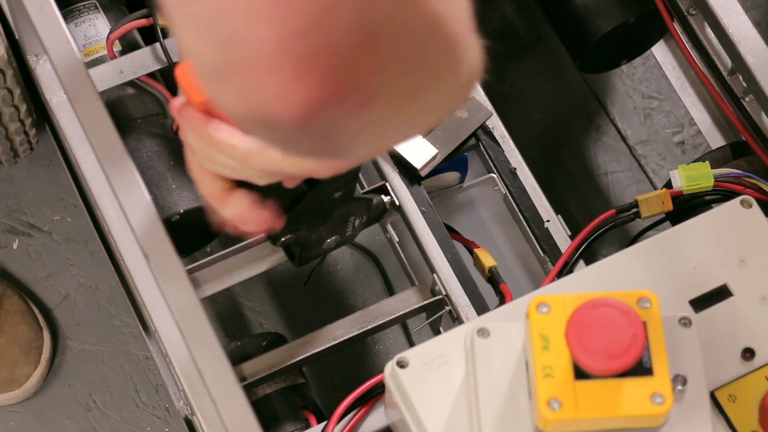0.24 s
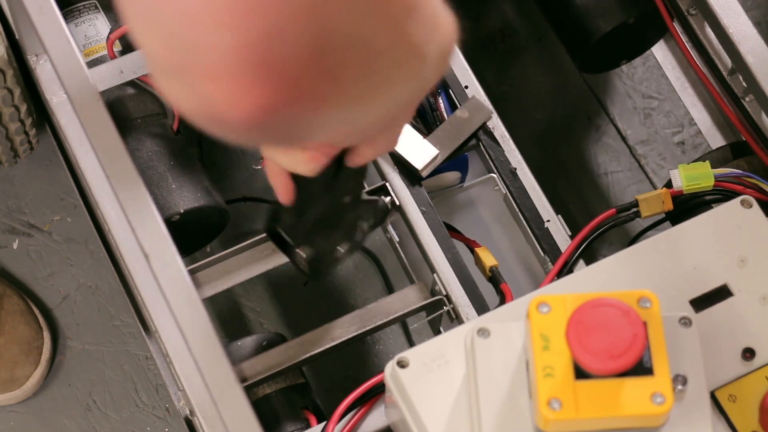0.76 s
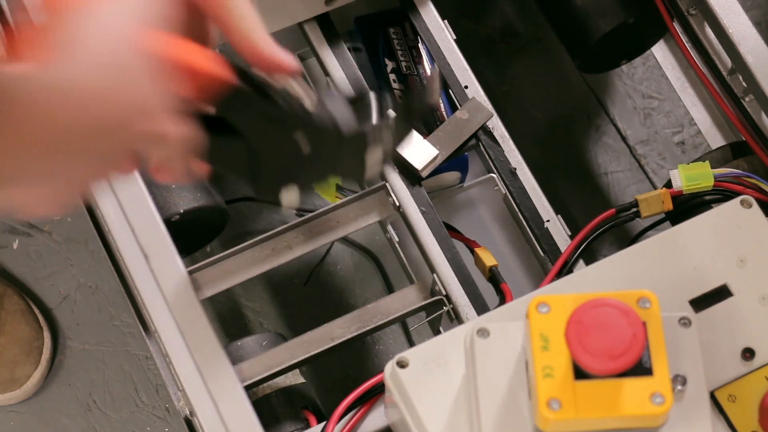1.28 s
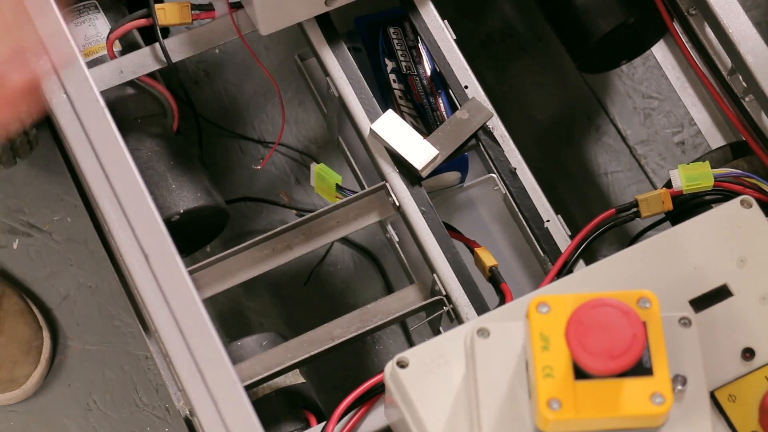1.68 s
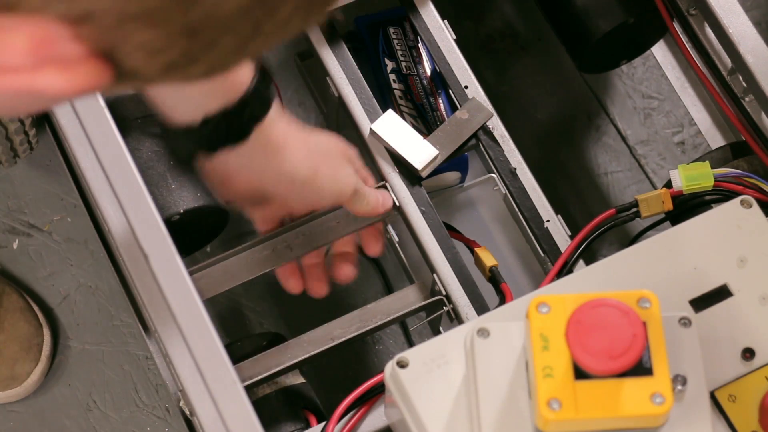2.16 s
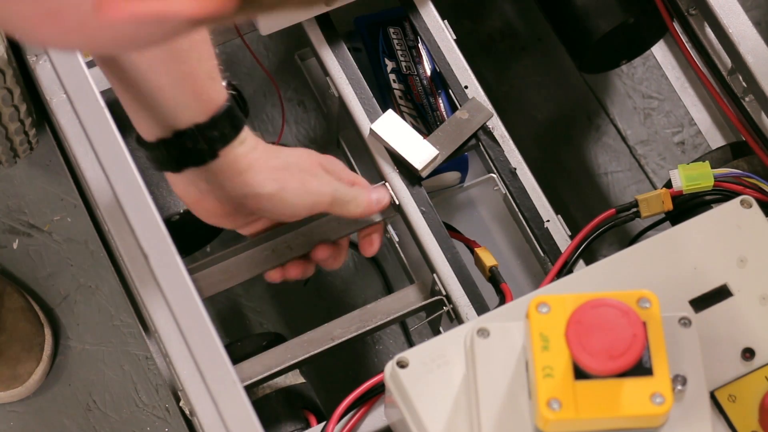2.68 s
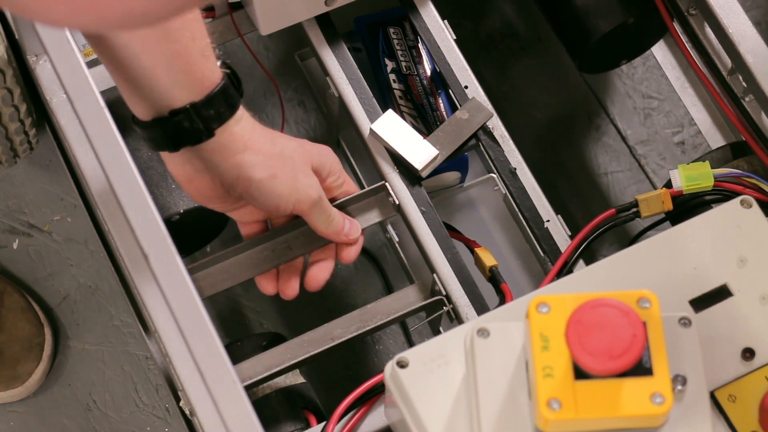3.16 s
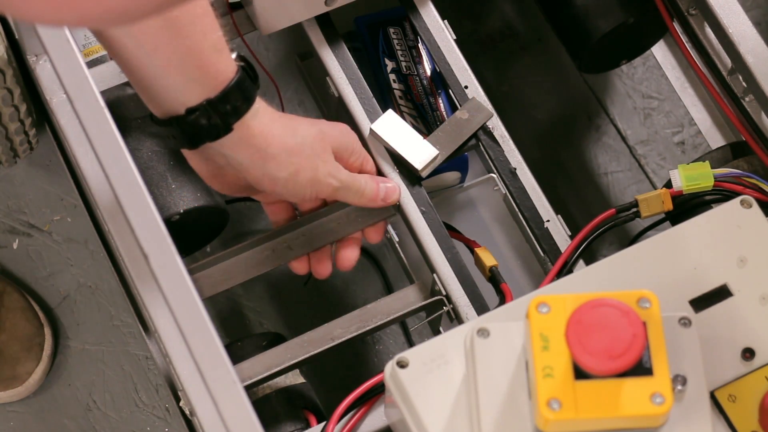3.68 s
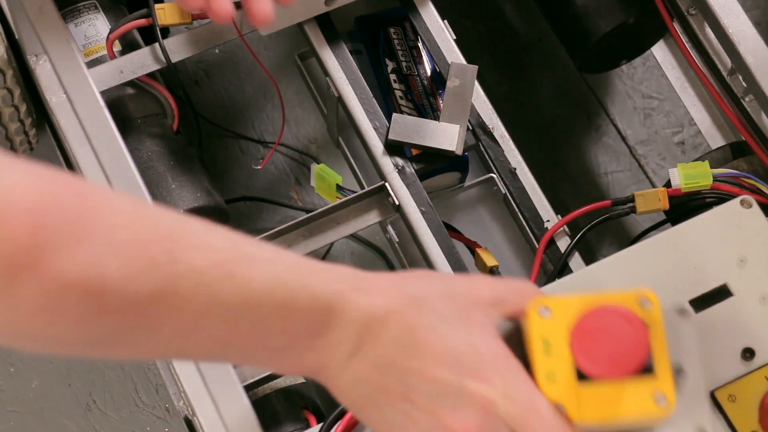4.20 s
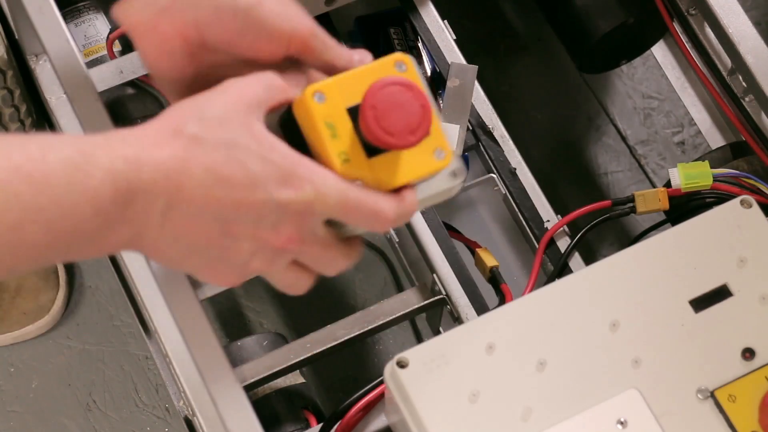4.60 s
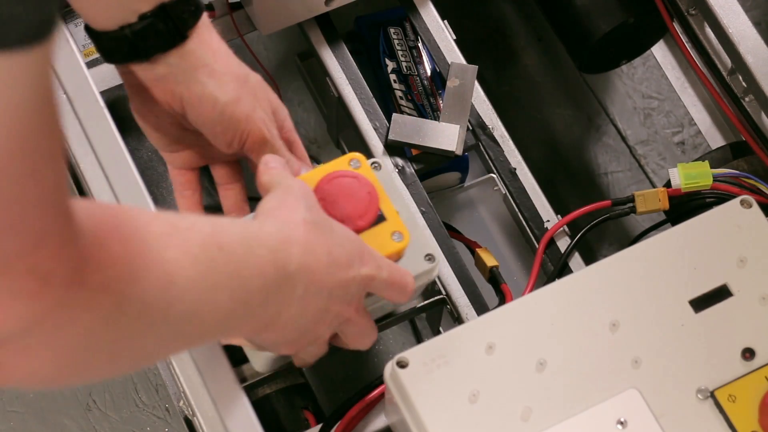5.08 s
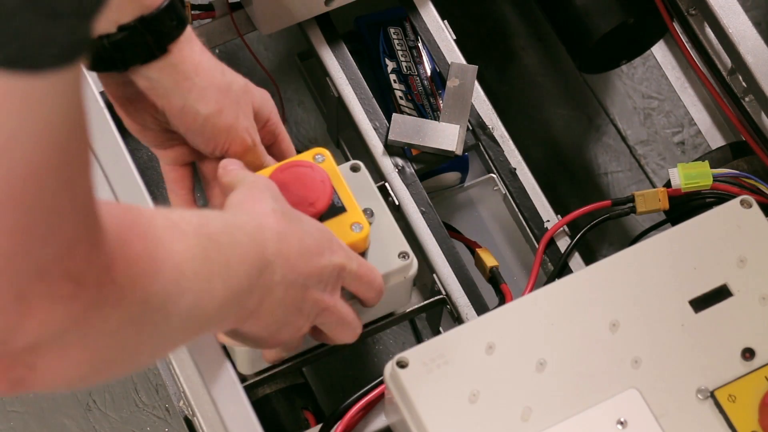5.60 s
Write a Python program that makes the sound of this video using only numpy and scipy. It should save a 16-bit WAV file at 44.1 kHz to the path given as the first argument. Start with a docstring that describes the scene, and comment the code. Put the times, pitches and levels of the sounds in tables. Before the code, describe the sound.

In a small workshop, a hand rivet tool clicks, then snaps very loudly, followed by tiny ticks, a metal bar clack and hollow plastic box knocks.

```python
"""Setting a blind rivet

A hand tool sets a blind rivet in an aluminium frame: its jaws slip, then the mandrel breaks with a snap that
overloads the microphone. Small ticks follow, a handled bar clacks, and a plastic switch box is knocked about.
Impacts are decaying modes and coloured noise; rubbing is a random train of friction slips through resonances.
A small workshop adds reverberation to most blows, under steady air noise and ventilation hum.
"""
import sys
import numpy as np
from scipy import signal
from scipy.fft import rfft, irfft, next_fast_len
from scipy.io import wavfile
from scipy.ndimage import map_coordinates

SR = 44100
rng = np.random.default_rng(int(sys.argv[2]) if len(sys.argv) > 2 else 0)


def dump_mix(stems):
    """Bounce the given channels to the path in sys.argv[1] as a 16-bit WAV at rate SR."""
    frames = np.atleast_2d(stems).T  # one column per channel
    limited = np.clip(frames, -1, 1)  # hard clip at full scale
    pcm = np.round(limited * 32767).astype(np.int16)
    wavfile.write(sys.argv[1], SR, pcm)


N = 257984
T = np.arange(SR) / SR  # the life of one blow, s


def amp(db):
    """Level law: decibels to amplitude gain."""
    return 10 ** (np.asarray(db) / 20)


def unit(x):
    """Normalization: x scaled to rms 1."""
    return x / np.sqrt(np.mean(x ** 2) + 1e-20)


def along(points, hz):
    """Logarithmic frequency scale: (frequency, value) points interpolated on it."""
    f, v = np.transpose(points)
    return np.interp(np.log(hz + 1), np.log(f + 1), v)


def wobble(rate, size=N):
    """Slow random modulation: a smooth curve through rate random knots a second."""
    knots = rng.standard_normal(int(size * rate / SR) + 4)
    return map_coordinates(knots, [np.arange(size) * rate / SR])


def fade(t60, t=T):
    """Exponential damping: a fall of 60 dB in t60 seconds."""
    return np.exp(-np.log(1000) * t / t60)


def noise(gain, size):
    """Spectral shaping: white noise coloured by a gain of frequency, at rms 1."""
    white = rfft(rng.standard_normal(size))
    return unit(irfft(white * gain(np.fft.rfftfreq(size, 1 / SR)), size))


def through(x, gain):
    """Linear filtering: x passed through a gain of frequency, at rms 1."""
    m = next_fast_len(N + SR // 2)
    return unit(irfft(rfft(x, m) * gain(np.fft.rfftfreq(m, 1 / SR)), m)[:N])


def colour(points, tilt_db=0):
    """Spectral envelope: a gain curve tilted about 1 kHz in dB per octave, the tilt level below 200 Hz."""
    return lambda hz: amp(along(points, hz) + tilt_db * np.log2(np.maximum(hz, 200) / 1000))


def resonances(peaks):
    """Damped oscillators: summed band-pass responses, width between half-power points, signs alternating."""
    def gain(f):
        total = 0
        for k, (centre, width, db) in enumerate(peaks):
            response = 1j * f * width / (centre * centre - f * f + 1j * f * width)
            total = total + (-1) ** k * amp(db) * response
        return total
    return gain


def narrow(peaks):
    """Separate resonances with steep skirts: gain is halved one width to either side of the centre."""
    return lambda f: sum(amp(db) / (1 + ((f - centre) / width) ** 2) for centre, width, db in peaks)


def ringing(modes, tilt_db=0, scatter_db=0):
    """Modal synthesis: a sum of decaying sines; loose joints make their phases wander."""
    out = np.zeros(SR)
    for hz, db, t60 in modes:
        size = amp(db + tilt_db * np.log2(hz / 1000) + scatter_db * rng.standard_normal())
        wander = .7 * wobble(70, size=SR)  # radians
        out += size * fade(t60) * np.sin(2 * np.pi * (hz * T + rng.random()) + wander)
    return out


def dying(x, decay):
    """Frequency-dependent damping: each band of x dies with its own t60."""
    hz, t, bands = signal.stft(x, SR, nperseg=256)
    damped = bands * fade(along(decay, hz)[:, None], t)
    return signal.istft(damped, SR, nperseg=256)[1][:len(x)]


def add(track, s, sound):
    """Superposition: mix a sound into the track from time s on."""
    part = track[max(round(s * SR), 0):][:len(sound)]
    part += sound[:len(part)]


# reverberation time of the workshop: frequency (Hz), t60 (s)
ROOM_DECAY = [(100, 0.25), (700, .6), (3000, 0.61), (8000, .48), (14000, 0.38)]


def in_room(x, wet_db):
    """Diffuse reverberation: a blow convolved with a decaying noise tail of unit energy."""
    tail = dying(rng.standard_normal(SR), ROOM_DECAY) * (1 - np.exp(-T / 0.0088))
    tail = tail / np.linalg.norm(tail)
    return x + amp(wet_db) * signal.fftconvolve(x, tail)[:len(x)]


def slips(rate, spread_db):
    """Stick-slip friction: tiny slips of uneven size at random times, about rate a second."""
    size = amp(spread_db * rng.standard_normal(N)) * rng.standard_normal(N)
    return size * (rng.random(N) < rate / SR)


# every rub: rise time, growth up to its end, t60 after it
RUB_ATTACK_S, RUB_SWELL_DB, RUB_RELEASE_S = 0.04, 3, 0.52


def stroke(s, length):
    """Friction envelope: a rub sets in, swells as the hand presses on, and decays after its end."""
    t = np.arange(N) / SR - s
    onset = np.clip(t / RUB_ATTACK_S, 0, 1)
    swell = amp(RUB_SWELL_DB * (np.clip(t / length, 0, 1) - 1))
    return onset * swell * fade(RUB_RELEASE_S, np.maximum(t - length, 0))


# spectrum of the room air: frequency (Hz), gain (dB)
AIR_COLOUR = [(20, -2), (100, -5.5), (145, -13.5), (220, -9), (370, -7.5), (450, -13.5), (580, -13.5),
              (850, -15), (1100, -21), (1700, -24), (2100, -28.5), (3600, -30), (4600, -32.5), (15800, -33)]
# ventilation hum and whir: centre_hz (Hz), width_hz (Hz), gain_db (dB)
DUCT_PEAKS = [(253, 13, 1), (289, 11, 4), (336.8, 26, 0), (1350, 73, -20), (2860, 160, -20.5)]


def workshop():
    """Stationary noise: broadband room air drifts slightly, over narrow bands of ventilation hum."""
    air = amp(-57.0 + .5 * wobble(3.5)) * noise(colour(AIR_COLOUR), N)
    hum = amp(-58.5) * noise(narrow(DUCT_PEAKS), N)
    return air + hum


# things slide along the metal: start_s (s), length_s (s), level_db (dB), share of ringing power (0-1)
SLIDE_STROKES = [(-.08, 0.19, -62.5, 0.17), (0.302, .13, -66, .25), (1.301, .25, -70.5, 0.1),
                 (1.547, .16, -61.5, 0.16), (2.132, .4, -63.5, 0.63), (2.696, 0.2, -66.5, 1),
                 (3.499, .11, -68.5, 0.72), (3.802, 0.12, -66.5, .75), (4.377, 0.55, -66, 0.35),
                 (5.027, .28, -64, 0.7), (5.697, 0.22, -60.5, 0.86)]
# spectrum of the scraping hiss: frequency (Hz), gain (dB)
SCRAPE_COLOUR = [(500, -4), (1500, -2.5), (3000, 0.5), (5000, -8), (8000, -1.5), (11000, -6.5),
                 (16000, -18)]
# thin ring of the bar, also heard at light touches: centre_hz (Hz), width_hz (Hz), gain_db (dB)
BAR_RESONANCES = [(3800, 160, -9.5), (4800, 170, -3), (5428, 170, -4.5), (5940, 170, -4), (6300, 150, 0),
                  (7000, 210, -3), (7360, 170, -8), (8100, 200, -8), (8560, 150, -8.5), (11400, 560, -15.5)]


def sliding():
    """Stick-slip excitation: slips hiss and ring the bar; as the contact moves, other modes take the lead."""
    friction = slips(rate=2700, spread_db=1.5)
    ring = np.zeros(N)
    for hz, width, db in BAR_RESONANCES:
        ring += amp(db + 6.3 * wobble(5.4)) * through(friction, resonances([(hz, width, 0)]))
    ring = unit(ring)
    hiss = through(slips(rate=3800, spread_db=3.0), colour(SCRAPE_COLOUR))
    out = np.zeros(N)
    for s, length, db, share in SLIDE_STROKES:
        mix = np.sqrt(share) * ring + np.sqrt(1 - share) * hiss
        out += amp(db) * stroke(s, length) * mix
    return amp(.8 * wobble(25)) * out


# hands shuffle on the bar, then on the box: start_s (s), length_s (s), murmur_db (dB), skin_hiss_db (dB)
GRIP_STROKES = [(0.036, .08, -62.5, -67.5), (2.118, .09, -64, -70), (2.384, 0.205, -60.5, -67),
                (4.03, 0.29, -67, -62.5), (4.57, 0.675, -62, -69), (5.275, .58, -57.5, -67)]
# spectrum of skin friction: frequency (Hz), gain (dB)
SKIN_COLOUR = [(100, -2.5), (350, 6.5), (600, -4), (1200, -13), (2300, -17.5), (3050, -3), (4000, -20.5),
               (9000, -24.5), (15000, -33)]
# resonances of the hollow box: centre_hz (Hz), width_hz (Hz), gain_db (dB)
SHELL_RESONANCES = [(553, 186, 4), (1800, 230, -13.5), (2140, 160, -15), (3180, 300, -16.5)]


def shuffling():
    """Forced resonance: rubbing fingers make a hollow shell murmur while the skin itself hisses softly."""
    shell = through(slips(rate=3100, spread_db=2.5), resonances(SHELL_RESONANCES))
    skin = through(slips(rate=3400, spread_db=1.5), colour(SKIN_COLOUR))
    rubs = np.zeros(N)
    for s, length, db, skin_db in GRIP_STROKES:
        rubs += stroke(s, length) * (amp(db) * shell + amp(skin_db) * skin)
    return amp(1.3 * wobble(40)) * rubs


# dull bumps of frame and hands: start_s (s), level_db (dB, before a common 2 dB cut), pitch_hz (Hz)
BUMP_EVENTS = [(0.261, -38, 25), (0.972, -30.5, 36), (1.406, -27, 77), (1.542, -38.5, 65),
               (1.841, -28, 54.2), (1.925, -35.5, 96), (2.208, -36.5, 49.2), (2.47, -41, 101),
               (2.569, -35, 56), (4.04, -34.5, 26), (4.19, -32, 32)]
BUMP_CYCLES = 6.2  # t60 in cycles of the pitch


def bumps():
    """Heavily damped oscillation: shifts of weight give a low push of a few cycles and a short rumble."""
    out = np.zeros(N)
    for s, db, hz in BUMP_EVENTS:
        rumble = amp(-7.5) * noise(narrow([(1.53 * hz, 0.65 * hz, 0)]), SR)
        push = np.sin(2 * np.pi * hz * T) + rumble
        envelope = (1 - np.exp(-T * hz * 2)) * fade(BUMP_CYCLES / hz)
        add(out, s, amp(db - 2.0) * envelope * push)
    return out


# the jaws slip on the mandrel: start_s (s), level_db (dB)
JAW_SLIPS = [(0.6552, -35.5), (0.6582, -39)]
# spectrum of the click, also used for the crack of the break: frequency (Hz), gain (dB)
CLICK_COLOUR = [(500, -15), (1800, -20.5), (2800, -8), (4600, 0), (5500, -6), (7000, -2.5), (9300, -5),
                (12000, -17), (16000, -26)]
# resonances of the steel head: centre_hz (Hz), width_hz (Hz), gain_db (dB)
HEAD_RESONANCES = [(2800, 63, -7.5), (4700, 39, -1), (5670, 28, -6.5), (6340, 50, -3), (7240, 110, -3),
                   (9124, 130, -6.5), (10400, 53, -12.5)]


def jaws():
    """Impulsive excitation: hard steel jaws slip under load, a bright short click that rings the tool's head."""
    out = np.zeros(N)
    for s, db in JAW_SLIPS:
        click = fade(0.062) * noise(colour(CLICK_COLOUR), SR)
        head = amp(-10.5) * fade(0.16) * noise(narrow(HEAD_RESONANCES), SR)
        add(out, s, amp(db) * (in_room(click, wet_db=-6.5) + head))
    return out


# the mandrel breaks, then the tool recoils against the frame: start_s (s), level_db (dB)
SNAP_BLOWS = [(0.8023, -5.5), (0.8155, -16.5), (0.8445, -21.5)]
# spectrum of tool and frame together: frequency (Hz), gain (dB)
BREAK_COLOUR = [(30, -19.5), (115, -11.5), (190, -22.5), (250, -8), (560, -10.5), (680, -4.5), (1050, -13),
                (1400, -6), (1750, -7.5), (2300, -4.5), (4200, -2.5), (8000, -4.5), (11000, -10),
                (15800, -19.5)]
# damping of their dense modes: frequency (Hz), t60 (s)
BREAK_DECAY = [(100, 0.2), (700, 0.24), (3000, 0.25), (8000, 0.21), (14000, 0.16)]
# the frame's strongest modes: pitch_hz (Hz), level_db (dB), t60 (s)
FRAME_MODES = [(483, -3.5, 0.18), (631, -7, 0.2), (814.2, -9, .24), (910, -3, .2), (1280, -4.5, .2),
               (1490, -4.5, 0.13), (2257, -1.5, 0.32), (2272, 1.5, 0.12), (2377, -1, 0.098),
               (2540, 0, 0.11), (2565, -1, 0.18), (2860, 4.5, .2), (2918, -2.5, 0.17), (2920, -7, .24),
               (3204, 0.5, .26), (3410, -0.5, .24), (3890, -4, .22), (4250, -2.5, .18), (4470, -3, 0.18),
               (4930, -4, 0.15), (5080, -3.5, 0.12), (6030, -3, 0.14), (6430, -3.5, .2), (6986, -5.5, 0.18),
               (7850, -2, .2), (8542, -3.5, 0.16)]


def rivet():
    """High modal density: the break rings tool and frame like decaying noise; a few strong modes stand out."""
    first_s = SNAP_BLOWS[0][0]
    blows = np.zeros(SR)
    for s, db in SNAP_BLOWS:
        dense = dying(noise(colour(BREAK_COLOUR), SR), BREAK_DECAY)
        crack = amp(-0.5) * fade(0.038) * noise(colour(CLICK_COLOUR, tilt_db=4), SR)
        add(blows, s - first_s, amp(db) * (dense + crack))
    # the released tool jolts the frame
    kick = amp(-22.5) * fade(0.074) * np.sin(2 * np.pi * 255 * T)
    ring = amp(-18) * ringing(FRAME_MODES)
    out = np.zeros(N)
    add(out, first_s, in_room(blows + kick, wet_db=-18.5) + ring)
    return out


# small ticks of loose parts: start_s (s), level_db (dB), pitch_hz (Hz)
TICK_EVENTS = [(1.228, -49.5, 1112), (1.6121, -40.5, 2114), (1.6975, -42, 1430), (1.7496, -48.5, 3810),
               (1.787, -42, 3800), (1.9463, -50, 3170), (1.9834, -45.5, 3450), (4.714, -50, 1633),
               (4.9205, -45.5, 2650)]
TICK_CYCLES = 40  # t60 in cycles of the pitch, so high ticks are shorter


def ticks():
    """Modal impact: each tick is a sharp contact and a brief bending mode."""
    out = np.zeros(N)
    for s, db, hz in TICK_EVENTS:
        body = (1 - np.exp(-T * hz)) * np.sin(2 * np.pi * hz * T)
        contact = amp(-4) * noise(narrow([(hz, 0.49 * hz, 0)]), SR)
        tick = fade(TICK_CYCLES / hz) * (body + contact)
        add(out, s, amp(db) * in_room(tick, wet_db=-7.5))
    return out


# spectrum of the edge click: frequency (Hz), gain (dB)
EDGE_COLOUR = [(300, -5), (850, 10), (1350, -5), (1800, 13.5), (2300, 10), (2700, 5), (3200, 6.5),
               (4500, -11), (8000, -8), (14000, -27.5)]


def knock(hz, click_db, t60):
    """Cavity resonance: a soft contact swells one damped shell mode; its walls rattle and its edge clicks."""
    rise = .07 * t60  # the shorter the knock, the harder its start
    swell = (1 - np.exp(-T / rise)) ** 2 * fade(t60)
    rattle = amp(-10) * noise(narrow([(hz * 1.18, 0.29 * hz, 0)]), SR)
    shell = swell / swell.max() * (np.sin(2 * np.pi * hz * T) + rattle)
    click = (1 - np.exp(-T / 0.00185)) * fade(0.057) * noise(colour(EDGE_COLOUR), SR)
    return shell + amp(click_db - 5.5) * click


# hollow knocks of hands, bar and plastic box: start_s (s), level_db (dB), pitch_hz (Hz),
# edge click relative to the shell (dB, before a common 5.5 dB cut), t60 (s), loss per rebound (dB)
KNOCK_EVENTS = [(2.145, -44.5, 375, -20.5, 0.029, 16), (2.174, -33.5, 468, -31, 0.014, 16),
                (2.194, -41, 423, -26, 0.033, 9), (2.612, -43, 664, -25, 0.056, 20),
                (4.629, -39.5, 516, 0, 0.036, 12), (4.812, -43, 524, -3, .035, 11),
                (5.044, -47.5, 592, -11, 0.043, 17), (5.274, -45, 608, -9.5, 0.039, 8),
                (5.404, -32.5, 602, -11, 0.042, 11), (5.416, -29, 530, -12, 0.03, 11.5),
                (5.491, -32.5, 663, -13.5, 0.023, 5), (5.519, -35.5, 642, -21.5, 0.022, 12),
                (5.579, -34, 648, -10, 0.043, 2), (5.682, -25, 564, -8.5, 0.026, 5.5),
                (5.7345, -34, 639, -15, 0.019, 17), (5.8265, -25, 512, -8, .03, 6)]
# time between rebounds; how much more each one clicks relative to its shell
REBOUND_S, REBOUND_EDGE_DB = .0102, 1


def box(count=4):
    """Inelastic rebound: each knock chatters, every contact weaker and with more edge than the last."""
    out = np.zeros(N)
    for s, db, hz, click_db, t60, loss_db in KNOCK_EVENTS:
        chatter = np.zeros(SR)
        for k in range(count):
            contact = knock(hz, click_db + k * REBOUND_EDGE_DB, t60)
            add(chatter, k * REBOUND_S, amp(-k * loss_db) * contact)
        add(out, s, amp(db) * in_room(chatter, wet_db=-9.5))
    return out


# the bar clacks against the frame: start_s (s), level_db (dB), tilt (dB per octave), contact t60 (s)
BAR_CLACKS = [(2.218, -53, 2, .05), (2.3198, -31.5, 0, 0.056), (2.458, -43.5, 2, 0.094),
              (2.611, -41, 3, 0.1), (4.625, -51, -3.5, 0.13), (5.684, -45, -6.5, 0.051),
              (5.693, -46.5, -1, 0.17)]
# spectrum of the contact: frequency (Hz), gain (dB)
CLACK_COLOUR = [(200, -9.5), (380, -3.5), (520, 6.5), (800, 3), (1050, -1), (1600, -0.5), (3200, 1),
                (5000, 1), (7500, -6.5), (10000, -16), (15000, -35)]
# modes of the held bar: pitch_hz (Hz), level_db (dB), t60 (s)
HELD_MODES = [(718, 2.5, 0.21), (895, -1.5, 0.15), (1226, 0.5, 0.063), (2360, -36, 0.27),
              (3010, -1.5, 0.15), (3100, -11, 0.13), (3460, -6, .16), (3900, -15, 0.18), (4400, -6, 0.14),
              (4660, -6, 0.13), (4840, -8, 0.27), (5270, -8, 0.13), (5900, -31, .2), (6670, -9, 0.16),
              (7300, -7.5, 0.25), (8100, -13, 0.202), (8950, -15, 0.22), (10500, -15, .15)]
# light touches that only make the bar ring: start_s (s), level_db (dB), centre_hz (Hz)
BAR_TOUCHES = [(2.738, -57, 4300), (3.745, -61, 6790), (5.246, -64, 5920), (5.314, -55, 6350),
               (5.734, -60, 4900), (5.775, -60, 5020)]
FREE_WIDTH = .25  # once let go, the bar's resonances narrow to this share of their width


def bar():
    """Damping by contact: the hand shortens the clacks of the bar; light touches leave a thin ring."""
    out = np.zeros(N)
    for s, db, tilt_db, t60 in BAR_CLACKS:
        contact = fade(t60) * noise(colour(CLACK_COLOUR, tilt_db), SR)
        ring = amp(-13) * ringing(HELD_MODES, tilt_db, scatter_db=4.0)
        add(out, s, amp(db) * (in_room(contact, wet_db=-7.0) + ring))
    free_bar = narrow([(centre, FREE_WIDTH * width, level) for centre, width, level in BAR_RESONANCES])
    for s, db, hz in BAR_TOUCHES:
        touch = narrow([(hz, .16 * hz, 0)])
        ring = noise(lambda f: free_bar(f) * touch(f), SR)
        add(out, s, amp(db) * fade(0.29) * ring)
    return out


def scene():
    """Superposition: all sources sum at the one microphone."""
    riveting = rivet() + jaws()
    handling = bar() + ticks() + box() + bumps()
    rubbing = sliding() + shuffling()
    return (riveting + handling + rubbing + workshop())[None]


TOP_HZ = 15850  # band limit


def record(dry):
    """Saturation and band limiting: the snap overloads the input, then all above the limit is removed."""
    ceiling, hardness = .8, 5  # full-scale share, knee exponent
    clipped = dry / (1 + np.abs(dry / ceiling) ** hardness) ** (1 / hardness)
    m = next_fast_len(N + SR // 2)
    passband = np.fft.rfftfreq(m, 1 / SR) < TOP_HZ
    return irfft(rfft(clipped, m) * passband, m)[..., :N]


dry = scene()
out = record(dry)
dump_mix(out)
```